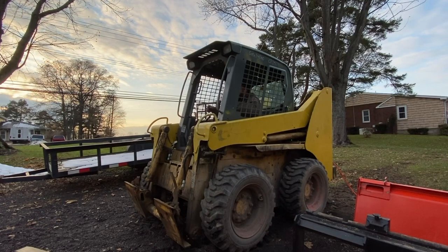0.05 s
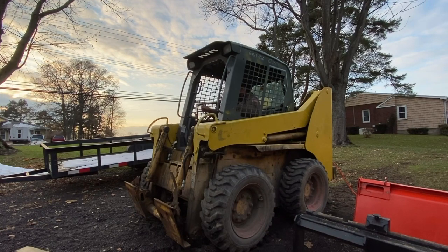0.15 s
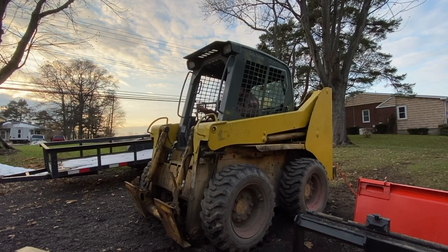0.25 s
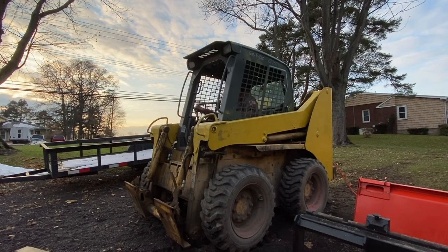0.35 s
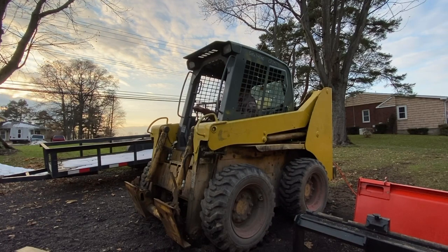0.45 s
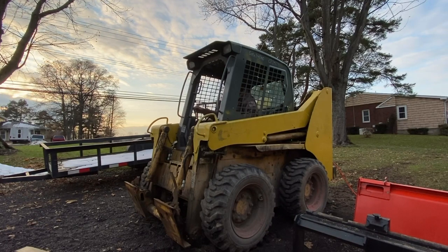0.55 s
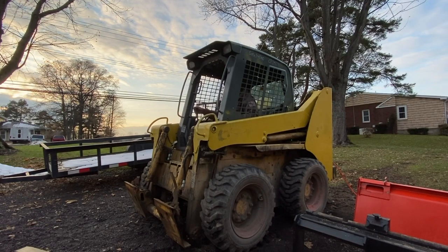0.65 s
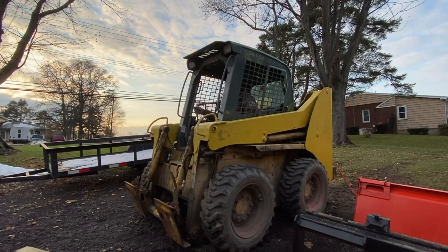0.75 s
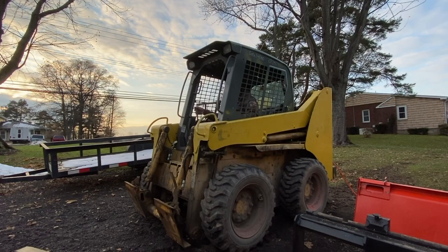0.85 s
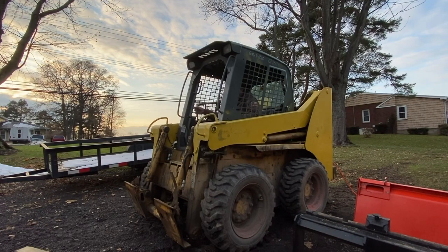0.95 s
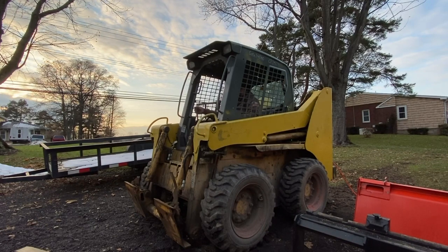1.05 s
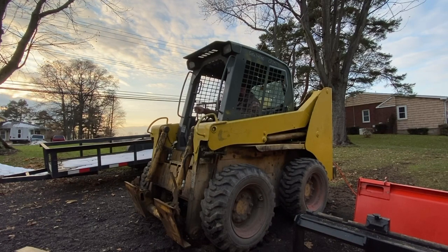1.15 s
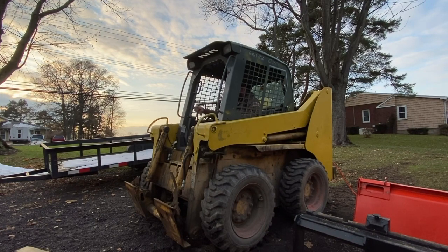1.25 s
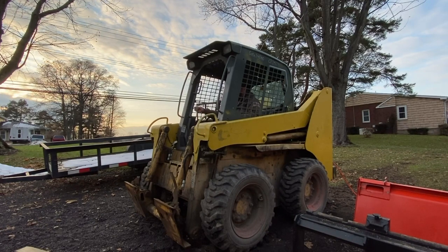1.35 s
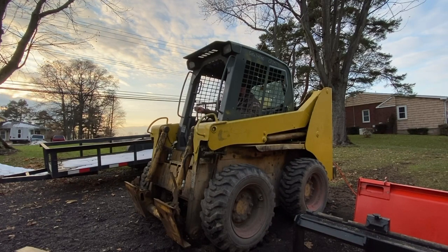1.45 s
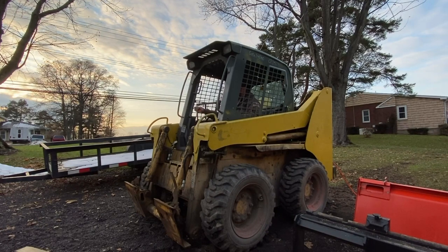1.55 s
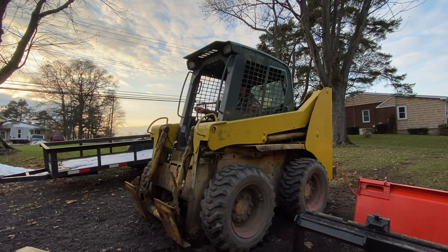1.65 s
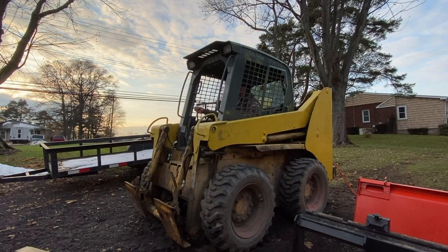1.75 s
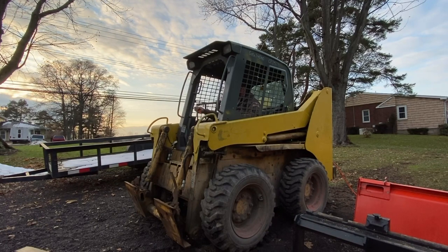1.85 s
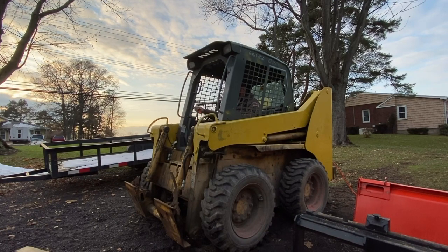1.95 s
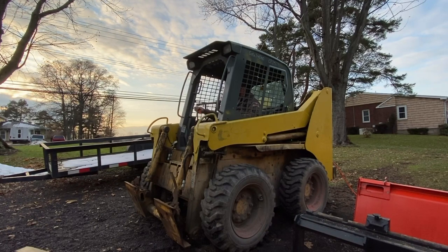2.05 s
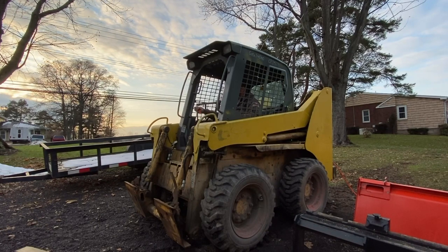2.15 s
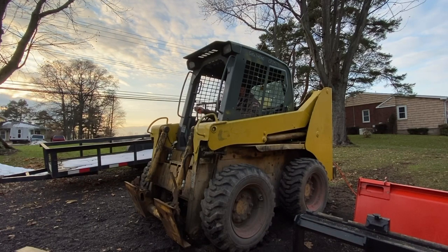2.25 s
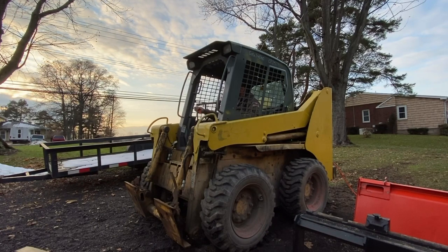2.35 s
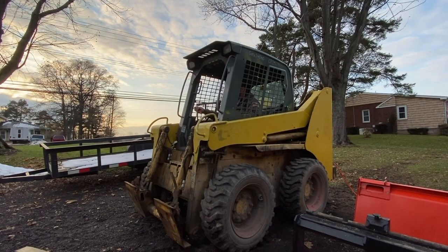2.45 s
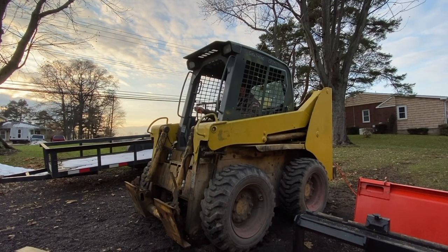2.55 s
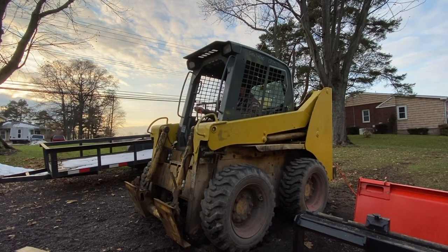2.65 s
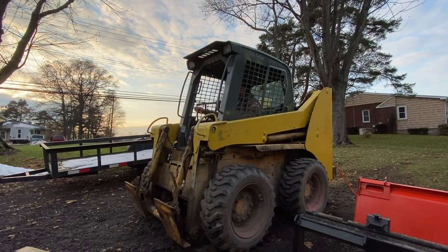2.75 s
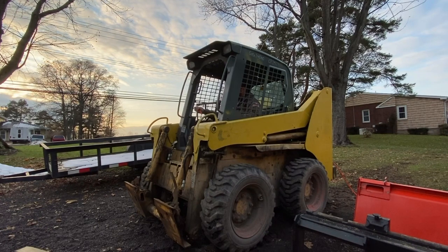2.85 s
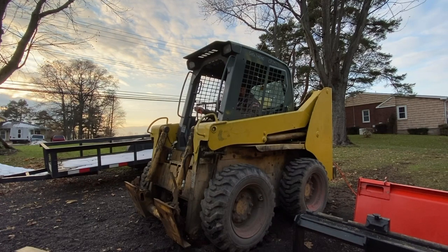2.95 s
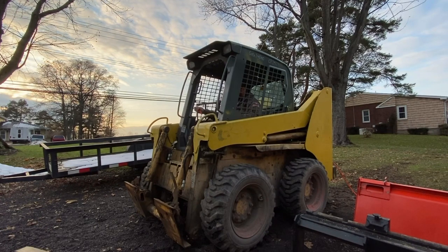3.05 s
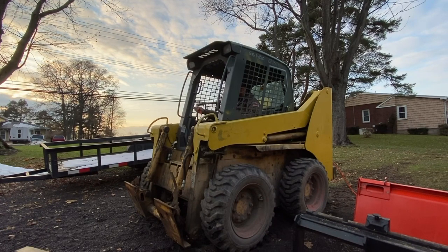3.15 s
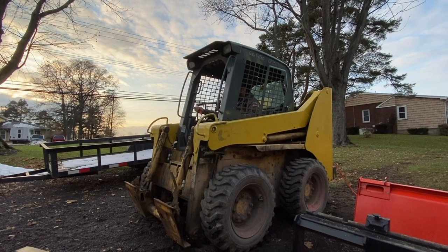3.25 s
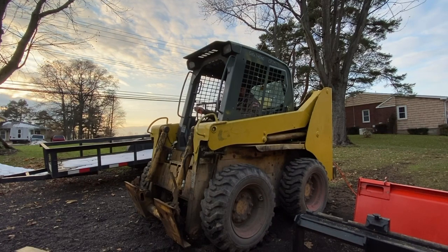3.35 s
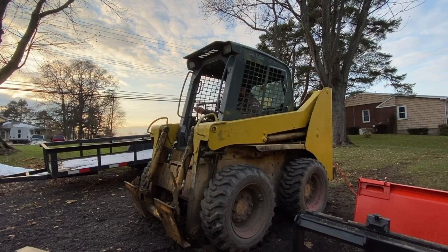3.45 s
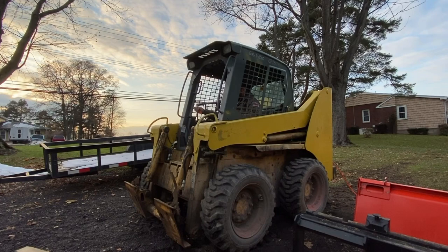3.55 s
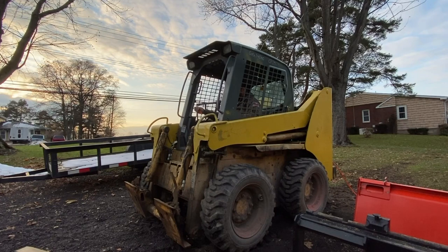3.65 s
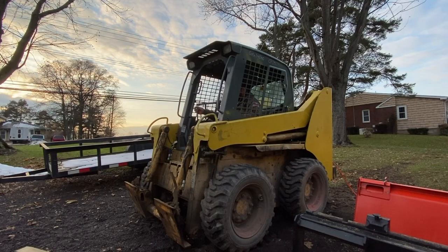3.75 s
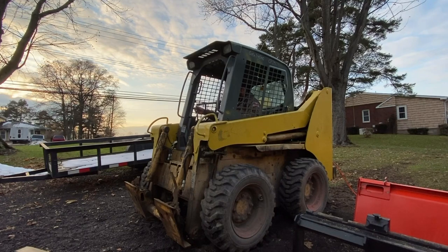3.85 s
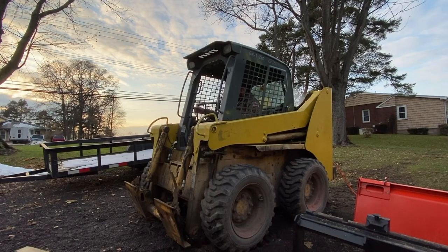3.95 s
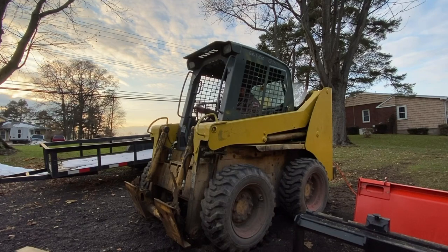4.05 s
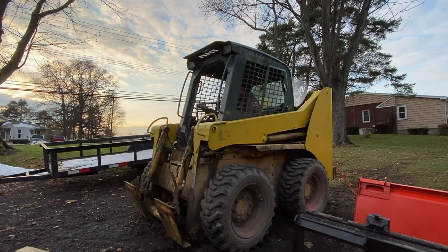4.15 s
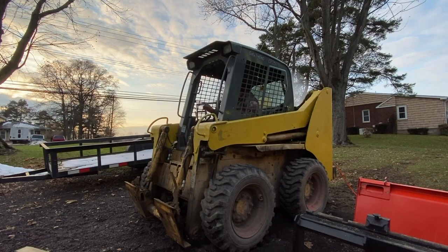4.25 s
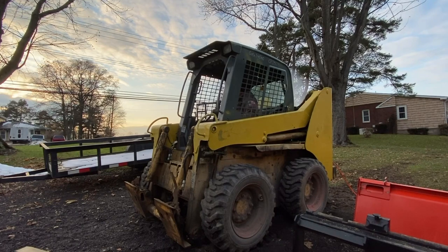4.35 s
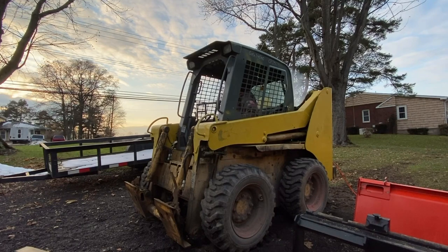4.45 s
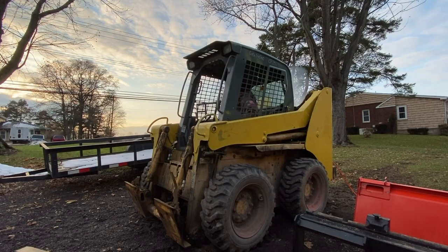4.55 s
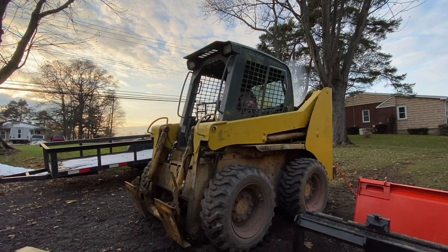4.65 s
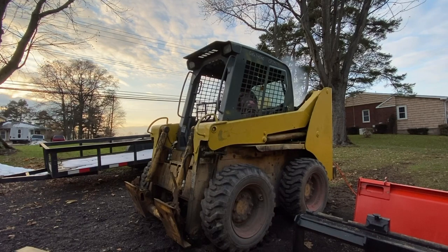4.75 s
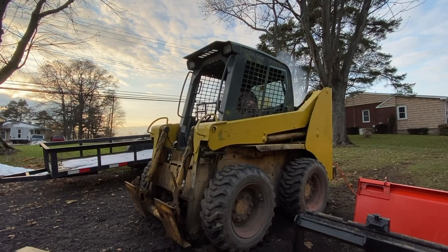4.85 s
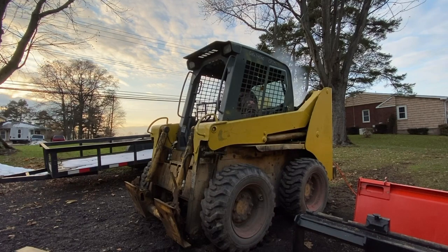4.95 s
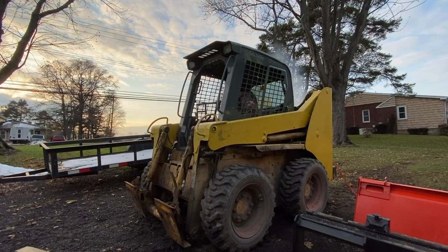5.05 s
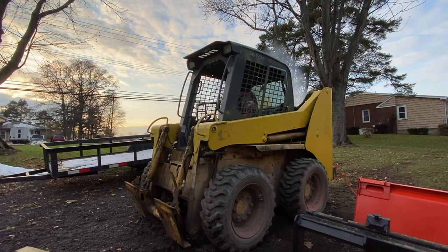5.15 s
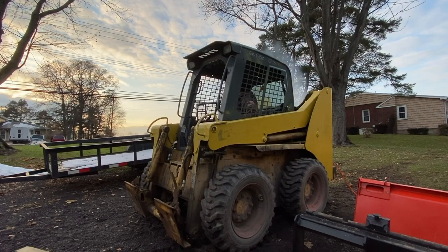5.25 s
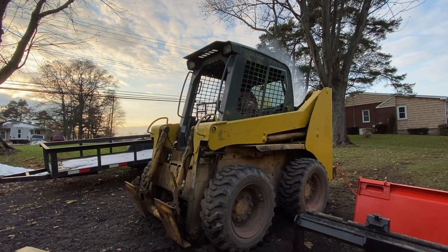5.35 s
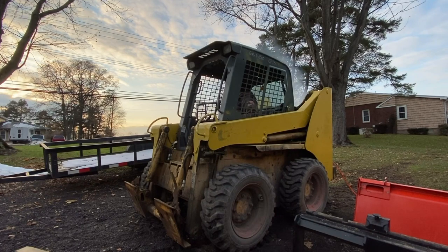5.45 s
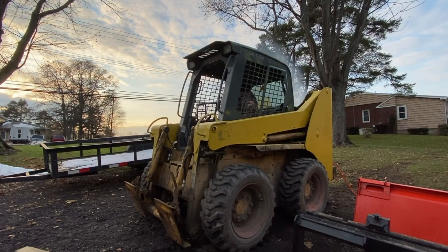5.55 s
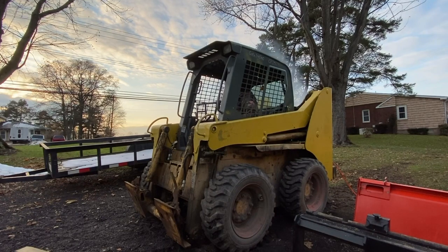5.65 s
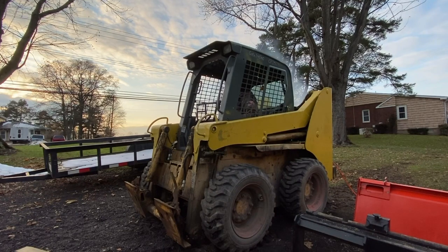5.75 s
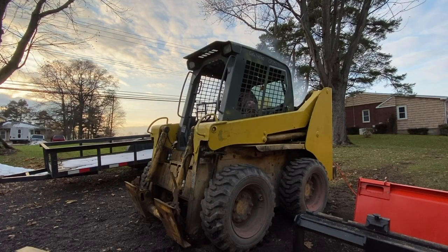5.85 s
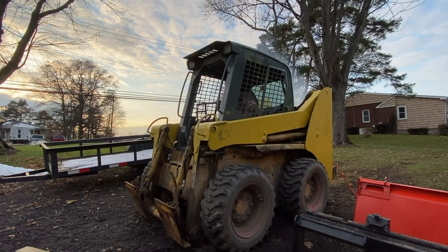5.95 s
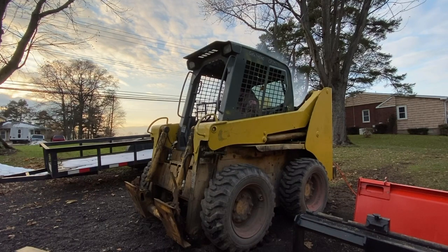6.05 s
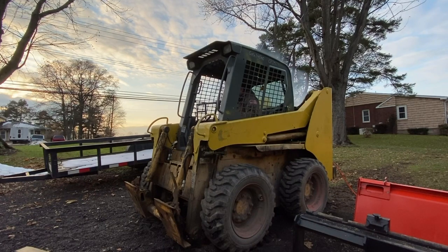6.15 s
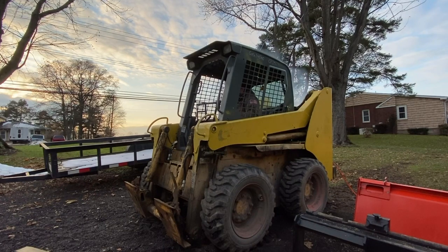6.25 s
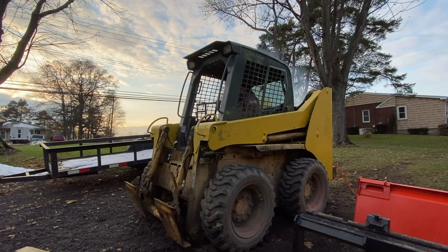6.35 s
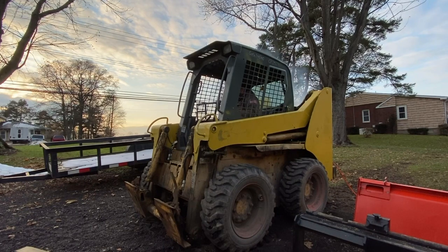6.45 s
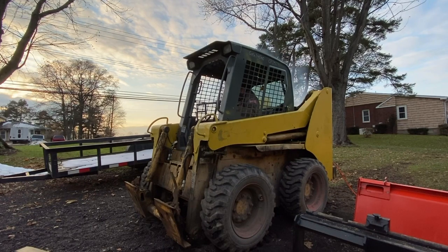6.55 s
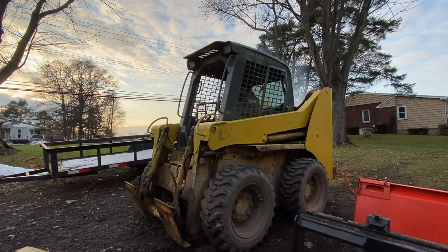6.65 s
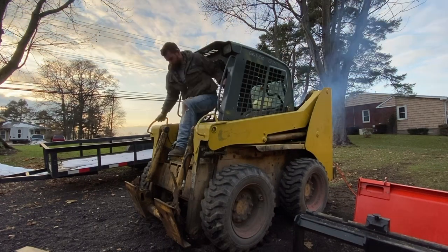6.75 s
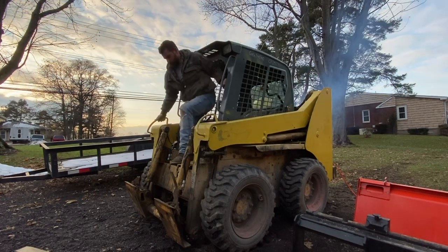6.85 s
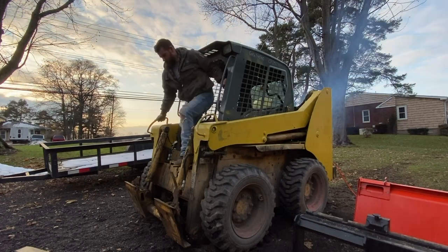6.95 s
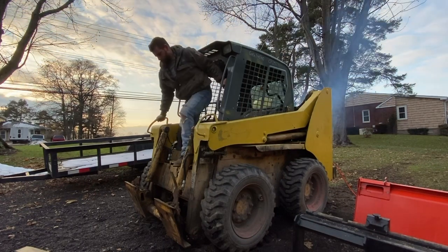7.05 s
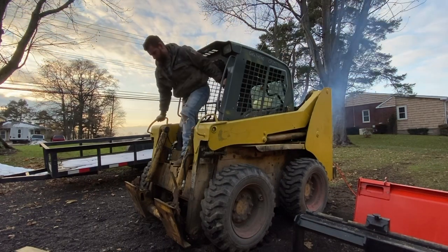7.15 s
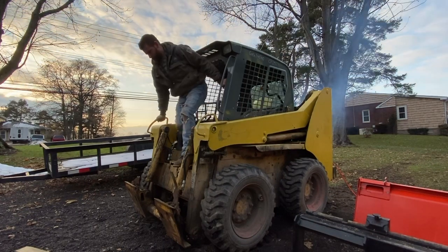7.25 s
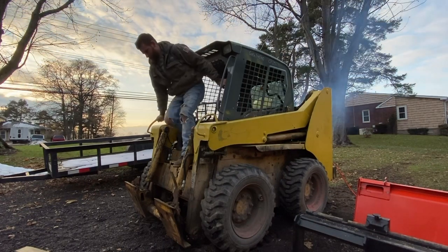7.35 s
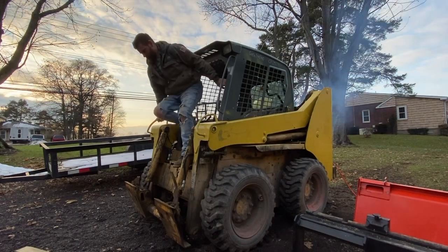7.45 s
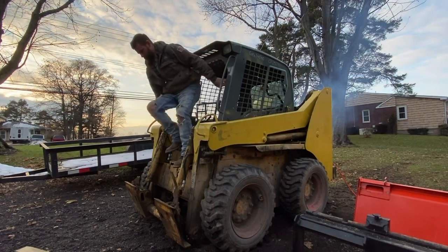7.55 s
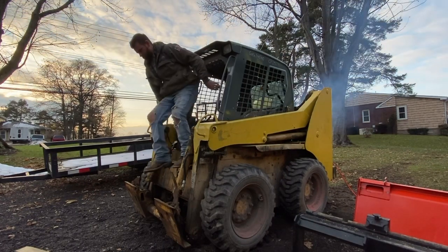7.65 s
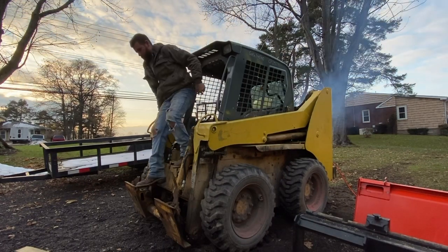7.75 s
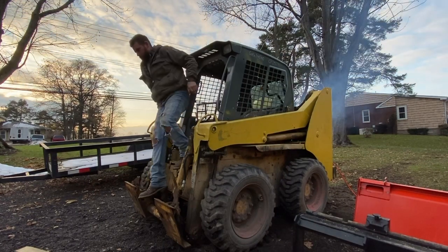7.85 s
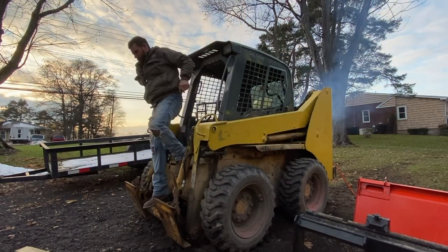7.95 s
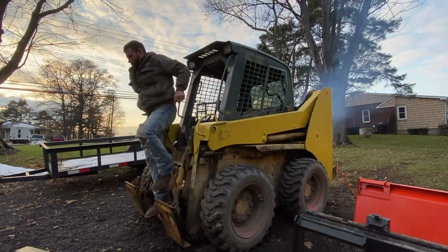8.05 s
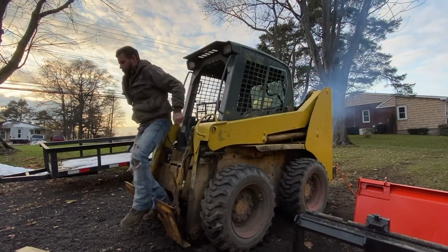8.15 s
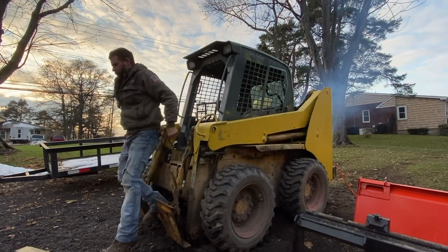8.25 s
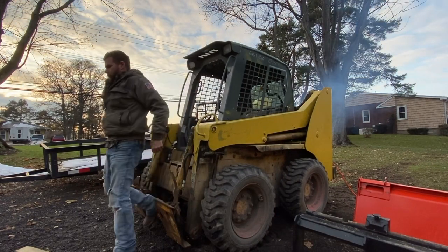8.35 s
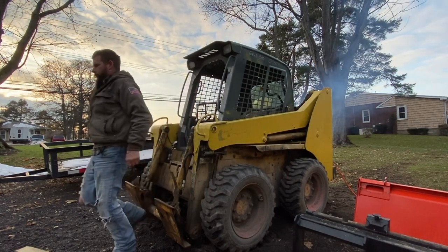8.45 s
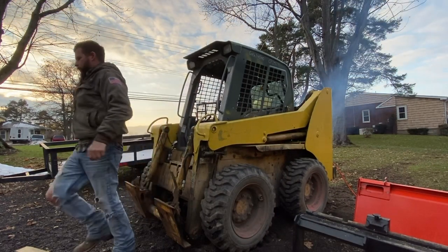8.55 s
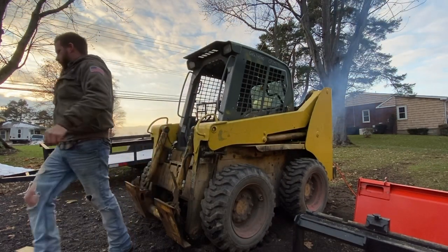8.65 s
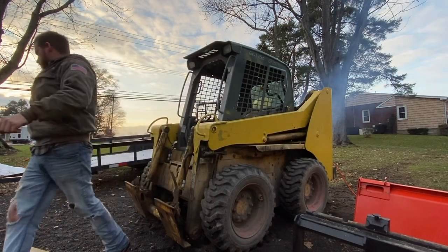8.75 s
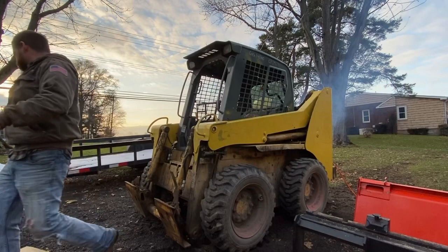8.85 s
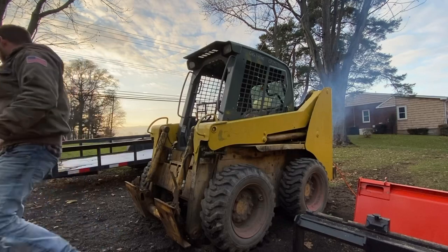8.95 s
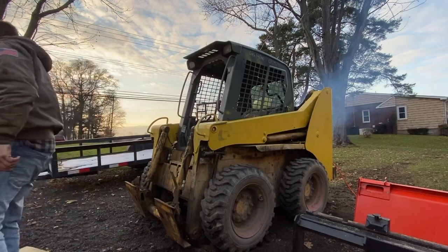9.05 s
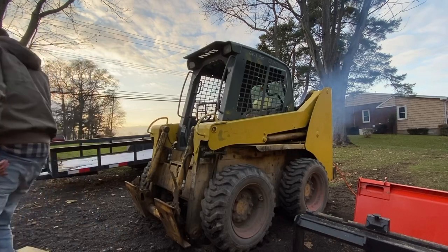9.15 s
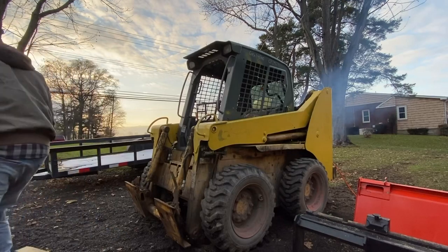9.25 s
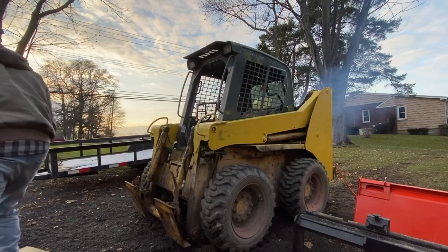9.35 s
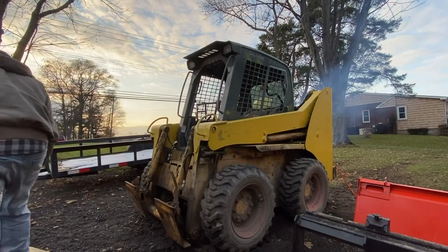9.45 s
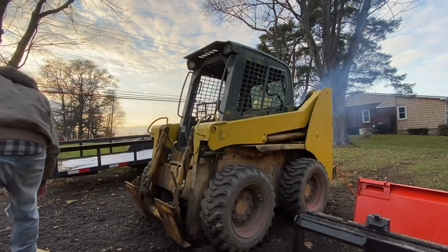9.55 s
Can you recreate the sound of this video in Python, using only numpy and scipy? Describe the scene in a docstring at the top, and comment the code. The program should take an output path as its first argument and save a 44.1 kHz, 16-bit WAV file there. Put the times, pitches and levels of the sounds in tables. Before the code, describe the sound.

Cab rustles and clicks, then a starter groans through compressions until a cold diesel knocks, catches roughly and jumps to a faster steady idle.

```python
"""Cold start of a compact loader's diesel

A four-cylinder engine in an open yard: cloth scuffs and clicks in the cab, then the starter bangs in and
groans through each compression as noise and gear tones in housing resonances. Single ignitions knock, the
engine catches, misfires and clears; from 6.6 s it is heard at a faster idle. Its layers are blows timed by
the crank. Two late clacks are boots on steel and gravel."""
import sys
import numpy as np
from scipy import signal
from scipy.fft import rfft, irfft, next_fast_len
from scipy.io import wavfile
from scipy.ndimage import uniform_filter1d, minimum_filter1d

SR = 44100
rng = np.random.default_rng(int(sys.argv[2]) if len(sys.argv) > 2 else 0)


def wrap_up_sound(samples):
    """Save the sound to the file named by the first command line argument, as 16-bit audio."""
    columns = np.atleast_2d(samples).T
    # keep every value between -1 and 1, then stretch to whole-number steps
    tamed = np.clip(columns, -1, 1)
    steps = np.round(tamed * 32767).astype(np.int16)
    wavfile.write(sys.argv[1], SR, steps)


N = 422478
T = np.arange(N) / SR
HZ = np.fft.rfftfreq(N, 1 / SR)

# engine speed: time_s, firings_per_s
SPEED_CURVE = [(3.37, 28.2), (3.62, 29.03), (3.9, 32.93), (4.12, 34.09), (4.38, 28.38), (4.87, 32.7),
               (5.17, 30.14), (5.68, 32.59), (5.92, 30.09), (6.15, 31.71), (6.6, 31.39), (6.68, 37.01),
               (7.15, 35.66), (7.55, 36.56), (8.3, 36.3), (9.58, 36.68)]
# cylinders in firing order, relative levels: exhaust_db, block_db, valve_tick_db, cold_rap_db
CYLINDER_LEVELS = [(1.5, -3, 20, 7), (8, -3.5, 22, 11.5), (5, -1, 24.5, 4), (4.5, -4.5, 20, 9.5)]
# starter strokes: start_s, level_db, gear_pitch_hz as it lets go, time to be dragged to a crawl_s
STROKES = [(1.309, -29.5, 216.2, 0.044), (1.509, -33, 316, .16), (1.724, -31.5, 338, 0.13),
           (1.904, -32.5, 373.3, 0.15), (2.098, -29, 385.4, 0.11), (2.297, -28.5, 387, 0.097),
           (2.456, -29, 380.3, 0.1), (2.612, -31, 385.8, 0.13), (2.806, -29, 388.8, .122),
           (3.005, -29, 450, .07), (3.216, -27, 539, 0.081), (3.325, -28.5, 440, 0.069)]
# single ignitions before the engine catches: start_s, knock_db, boom_db
SINGLE_IGNITIONS = [(2.308, -29, -25), (3.006, -16.5, -14), (3.068, -30, -10), (3.136, -36, -17),
                    (3.216, -16.5, -28), (3.325, -25, -13)]
# spectrum of the exhaust pipe: freq_hz, level_db
PIPE_SPECTRUM = [(18, -39.5), (28, -63), (36, -10), (46, 7), (62, 2), (74, 8.5), (95, 0.5), (110, -2),
                 (135, -15), (170, -44.5), (300, -29), (700, -103)]
# spectrum of the starter gears: freq_hz, level_db
GEAR_SPECTRUM = [(90, 4), (200, 3.5), (380, -2), (470, 3), (620, 2), (850, 0), (1100, -5), (1570, -9.5),
                 (2200, -12), (2800, -20), (5500, -19), (8000, -37.5), (15000, -70)]
KNOCK_RISE_S = 0.006


def gain_of(db):
    """Decibels to gain."""
    return 10 ** (np.asarray(db) / 20)


def evened(x):
    """Scales to rms 1."""
    return x / np.sqrt(np.mean(x ** 2) + 1e-20)


def read(points, hz):
    """Reads a spectrum on a log-frequency axis."""
    f, value = np.transpose(points)
    return np.interp(np.log(hz + 1), np.log(f + 1), value)


def add(mix, s, sound):
    """Adds a sound to the mix at time s."""
    part = mix[..., max(round(s * SR), 0):][..., :sound.shape[-1]]
    part += sound[..., :part.shape[-1]]


def causal(spectrum, size=16384):
    """Minimum-phase impulse response of unit energy: the body rings only after the blow."""
    log_gain = np.log(gain_of(read(spectrum, abs(np.fft.fftfreq(size, 1 / SR)))))
    min_phase = np.exp(np.conj(signal.hilbert(log_gain)))
    ring = np.fft.ifft(min_phase).real[:size // 2]
    return ring / np.linalg.norm(ring)


def colour(x, spectrum):
    """Passes two streams through a body with this spectrum."""
    return signal.oaconvolve(x, causal(spectrum)[None], axes=1)[:, :N]


def resonate(x, hz, width_hz):
    """One-pole resonance of gain 1, made by shifting hz to zero and smoothing."""
    turn = np.exp(2j * np.pi * np.cumsum(hz * np.ones(N)) / SR)
    r = np.exp(-np.pi * width_hz / SR)
    smoothed = signal.lfilter([1 - r], [1, -r], x / turn + 1e-18)
    return 2 * (turn * smoothed).real


def hiss(size=N):
    """White noise in two independent streams."""
    return rng.standard_normal((2, size))


def burst(rise_s, t60_s, size=13000):
    """A blow scattered over many panels: noise that swells fast, dies away and is cut at size samples."""
    t = T[:size]
    return hiss(size) * (1 - np.exp(-t / rise_s)) * gain_of(-60 * t / t60_s)


def drift(per_s):
    """Smooth chance of rms 1, with per_s new values a second."""
    return evened(np.interp(T * per_s, np.arange(4000), rng.standard_normal(4000)))


def scatter(x, t60_s):
    """Many panels throw a sound into both streams, smearing its pitch."""
    paths = burst(0.011, t60_s)
    return signal.oaconvolve(x[None], paths / np.linalg.norm(paths[0]), axes=1)[:, :N]


def below(x, hz, order):
    """The part of a sound below hz, by a zero-phase roll-off."""
    size = next_fast_len(N + SR)
    f = np.fft.rfftfreq(size, 1 / SR)
    return irfft(rfft(x, size) / (1 + (f / hz) ** order), size)[:, :N]


def limit(x, ceiling, size):
    """Look-ahead limiter: gain eases down around each peak above the ceiling."""
    gain = np.minimum(1, ceiling / (abs(x).max(0) + 1e-9))
    return x * uniform_filter1d(minimum_filter1d(gain, size), size)


def spread(x):
    """Stream 0 feeds both microphones alike, stream 1 in opposite sign; their share and tilt vary with pitch."""
    # left-right likeness: freq_hz, correlation
    likeness = [(60, 0.7), (100, 1), (160, 0.45), (270, 0.64), (450, 0.88), (740, 0.093), (2000, 0.39),
                (3300, 0.17), (15000, 0.037)]
    # left minus right: freq_hz, tilt_db
    tilt = [(100, -0.5), (250, -0.5), (600, -0.5), (1300, -1.4), (2600, .5), (5000, 4), (9000, -0.5)]
    common, opposed = rfft(x)
    same = np.clip(read(likeness, HZ), 0, 1)
    half_tilt_db = read(tilt, HZ) / 2
    side = opposed * np.sqrt((1 - same) / (1 + same))
    left = (common + side) * gain_of(half_tilt_db)
    right = (common - side) * gain_of(-half_tilt_db)
    return irfft(np.array([left, right]), N)


def faster_idle():
    """0 at the slow idle, 1 at the faster one."""
    return np.interp(T, [6.6, 6.72], [0, 1])


def crank():
    """Crank position in firings: the integral of the firing rate, offset by -0.4."""
    s, rate = np.transpose(SPEED_CURVE)
    return np.cumsum(np.interp(T, s, rate) * (T > s[0])) / SR - .4


def firings(lag, advance=0):
    """Event times and cylinders, lag firings after the exhaust peak, advance firings earlier at fast idle."""
    turns = crank() + advance * faster_idle()
    k = np.arange(int(turns[-1]) + 1)
    turning = T > SPEED_CURVE[0][0]
    return np.interp(k + lag, turns[turning], T[turning]), k % len(CYLINDER_LEVELS)


def running(x, axis):
    """Evens an engine layer while it runs, then gives it its column of the running levels."""
    # running levels, before each layer's trim: time_s, exhaust_db, block_db, valve_gear_db
    levels = [(3.3, -21, -37, -48), (3.6, -15, -28.5, -39), (4.4, -9, -27, -42), (5.8, -9.5, -28.5, -41.5),
              (6.6, -7.5, -28.5, -42), (6.73, -16, -29, -40), (9.58, -16, -28.5, -39)]
    rows = np.array(levels)
    rms = np.sqrt(np.mean(x[..., T > rows[0, 0]] ** 2))
    return x / rms * gain_of(np.interp(T, rows[:, 0], rows[:, axis]))


def yard():
    """Distant traffic rumble in the open air: steady coloured noise."""
    # rumble spectrum: freq_hz, level_db
    spectrum = [(15, -35), (25, -22), (66, 0.5), (90, 0), (103, 0), (125, 1.5), (142, -6.5), (231, -18.5),
                (373, -19), (462, -25), (833, -26), (2800, -45), (15000, -63)]
    return gain_of(-47.5) * colour(hiss(), spectrum)


def rustles(grain_db=4):
    """Clothes scuff on the seat in short swells of grainy noise."""
    # shifts in the seat: start_s, length_s, level_db
    shifts = [(0.0, 0.059, -43.5), (0.127, 0.066, -61), (0.324, 0.18, -53), (0.5, 0.13, -52)]
    # cloth spectrum: freq_hz, level_db
    spectrum = [(75, 22), (200, 17), (500, 5), (1000, -5), (2500, -9), (3200, -31), (5500, -29),
                (9000, -36), (15000, -47)]
    level = sum(gain_of(db) * np.sin(np.pi * np.clip((T - s) / length, 0, 1)) for s, length, db in shifts)
    grain = evened(gain_of(grain_db * drift(148.4)))
    return colour(hiss() * level * grain, spectrum)


def clicks(t60_s=0.12, rise_s=0.0011, tail_t60_s=0.72, clack_db=-2, ring_db=-15, tail_db=-23):
    """A noise clack and one rebound, mode clusters of small steel parts, and a faint tail from the cab."""
    # cab clicks, solenoid, boots on steel and gravel: start_s, level_db, pitch_factor, ringing_part
    hits = [(0.638, -35, 0.99, "latch"), (0.643, -48, 0.87, "latch"), (0.742, -51, 1.06, "switch"),
            (0.768, -54.5, 1.1, "switch"), (0.8, -64, 1.57, "switch"), (0.923, -46, 1.2, "switch"),
            (0.935, -36, 0.99, "switch"), (1.085, -69, 1.3, "switch"), (1.234, -43, 0.54, "latch"),
            (1.258, -43, 0.38, "latch"), (1.271, -36, 0.56, "latch"), (8.268, -38, 1.23, "latch"),
            (9.05, -37, 0.8, "latch")]
    # latch modes: freq_hz, level_db, t60_s
    latch_modes = [(546, 7.5, 0.12), (1320, -6, .08), (2030, 4, 0.1), (2250, 1, 0.068), (3020, 3, 0.12),
                   (3569, 1, 0.16), (3800, 7, 0.1), (3930, 7, 0.14), (6130, -8, 0.1)]
    # switch modes: freq_hz, level_db, t60_s
    switch_modes = [(570, 4, 0.08), (2720, 5.5, 0.082), (3450, -10, 0.1), (4064, -1, 0.12),
                    (4400, 1.5, .09), (4452, 3, 0.1), (4900, 1, 0.1), (5507, 7, 0.083), (5600, 2, 0.13),
                    (6600, -2, 0.1)]
    # clack spectrum: freq_hz, level_db
    spectrum = [(180, -8), (300, 2), (577, -3), (1150, -13), (1310, -9), (2040, -10), (2360, -11),
                (3860, -6), (11900, -18), (15000, -25)]
    t, clack, rings = T[:13000], np.zeros((2, N)), np.zeros((2, N))
    rebounds = [(s + .022, db - 9.5, size, part) for s, db, size, part in hits]
    for s, db, size, part in hits + rebounds:
        blow = burst(rise_s, t60_s) + gain_of(tail_db) * burst(0.0083, tail_t60_s)
        add(clack, s, gain_of(db + clack_db) * blow)
        ring = np.zeros((2, len(t)))
        for hz, level_db, life_s in latch_modes if part == "latch" else switch_modes:
            for _ in range(3):  # each mode is a cluster of three
                pitch_hz = (hz + rng.uniform(-45, 45)) * size
                tone = np.sin(2 * np.pi * (pitch_hz * t + rng.random((2, 1))))
                ring += gain_of(level_db - 60 * t / life_s) * tone
        add(rings, s, gain_of(db + ring_db) * ring * (1 - np.exp(-t / rise_s)))
    return colour(clack, spectrum) + rings


def gear(hz, tooth_wobble=.022):
    """Tooth count and tone of one mesh: the pitch strays by a share, each partial flutters on its own."""
    teeth = np.cumsum(hz * (1 + tooth_wobble * drift(220))) / SR
    tone = np.zeros(N)
    for n in range(1, 7):
        flutter = gain_of(2.5 * drift(90))
        tone += flutter * np.cos(2 * np.pi * n * (teeth + rng.random())) / n ** .6
    return teeth, tone


def starter(race_s=.005, drag=1.4, crawl_hz=242.3, slowest_hz=199.3, off_s=3.4, reduction_ratio=1.47,
            reduction_db=-10, coast_db=-12, swell_db=-3, whine_db=1, grind_db=-6, ring_db=-9, echo_db=-7,
            worn_db=2.5, whirr_db=-44, bang_db=-20):
    """The pinion grinds on the ring gear; after each compression it races, then the next drags it down."""
    # housing resonances: freq_hz, width_hz, level_db
    housing = [(217.7, 27, 3), (310, 40, 4.5), (384, 52, 1.5), (473, 43, 2.5), (576, 33, 6), (800, 61, 2.5),
               (986, 19, 1), (1280, 90, -3), (1520, 61, 0), (2120, 420, -8), (3370, 220, -8.5)]
    # brush and armature spectrum: freq_hz, level_db
    whirr_spectrum = [(300, 7.5), (900, 10), (2300, 5.5), (3400, 1.5), (5600, -3), (7500, -11), (10400, -9),
                      (14000, -21), (15500, -20)]
    rows = np.array(STROKES)
    start, db, top_hz, crawl_s = rows[np.maximum(np.searchsorted(rows[:, 0], T) - 1, 0)].T
    since_s = np.maximum(T - start, 0)
    part = since_s / crawl_s
    on = (T > rows[0, 0]) & (T < off_s)
    stroke = gain_of(db + np.interp(part, [0, .5, .85, 1.2], [swell_db, 0, -4, coast_db]))
    load = uniform_filter1d(on * stroke, size=200)
    hz = np.maximum(top_hz - abs(top_hz - crawl_hz) * part ** drag, slowest_hz)
    hz = hz - (hz - crawl_hz) * np.exp(-since_s / race_s)
    teeth, mesh = gear(hz)
    # the reduction gear sings above the pinion
    mesh = mesh + gain_of(reduction_db) * gear(reduction_ratio * hz)[1]
    # worn teeth bite unevenly
    bite = 0.54 + np.exp(-(teeth % 1) / 0.35)
    scrape = evened(hiss() * bite * gain_of(worn_db * drift(160)))
    # tooth harmonics slide through the housing resonances, summed in alternating sign
    ring, whine = 0, 0
    for k, (f, width_hz, level_db) in enumerate(housing):
        gain = (-1) ** k * gain_of(level_db)
        ring = ring + gain * resonate(scrape, f, width_hz)
        whine = whine + gain * resonate(mesh, f, width_hz)
    tone = gain_of(whine_db) * load * whine / np.std(whine[on])
    out = load * (gain_of(grind_db) * colour(scrape, GEAR_SPECTRUM) + gain_of(ring_db) * evened(ring))
    out += gain_of(echo_db) * scatter(tone, .08)
    out += tone * np.array([[.8], [0]])  # direct whine, common to both microphones
    # brushes and armature whirr on evenly
    out += gain_of(whirr_db) * uniform_filter1d(on * 1., size=900) * colour(hiss(), whirr_spectrum)
    bang = np.zeros((2, N))
    rough = gain_of(worn_db * drift(151)[:13000])
    add(bang, 1.258, gain_of(bang_db - 12.0) * burst(0.016, 1.0) * rough)
    add(bang, 1.298, gain_of(bang_db) * burst(0.0032, 0.11))
    return out + colour(bang, GEAR_SPECTRUM)


def pinion(rise_s=.004, t60_s=0.41, grit_db=4):
    """Tooth ends scrape brightly as the pinion slides into the ring gear: one gritty noise burst."""
    # pinion engagement: start_s, level_db
    meshing = (1.27, -51.5)
    # scrape spectrum: freq_hz, level_db
    spectrum = [(2000, -12), (6000, -8), (9500, 4), (14000, -2), (15500, -8)]
    s, db = meshing
    out = np.zeros((2, N))
    add(out, s, gain_of(db) * burst(rise_s, t60_s))
    return colour(out * evened(gain_of(grit_db * drift(220))), spectrum)


def shake(level_db=-39):
    """Frame shudder: pipe-coloured noise that grows as the starter turns, then stays."""
    growth = np.interp(T, [1.28, 1.32, 3.3, 3.5], [0.012, 0.73, 1.5, 3.6])
    return gain_of(level_db) * colour(hiss(), PIPE_SPECTRUM) * growth


def thumps(rise_s=0.011, puff_lead_s=.0627, puff_db=-25.5, puff_hz=60.4, boom_delay_s=.0093, boom_hz=66.4):
    """Engagement jolt, air puffs of cranking and first ignitions each ring low for a few cycles."""
    # frame jolt as the pinion engages: start_s, level_db, nominal pitch_hz
    jolt = (1.307, -19, 99)
    puffs = [(s - puff_lead_s, puff_db, puff_hz) for s, *_ in STROKES[2:-1]]
    booms = [(s + boom_delay_s, db, boom_hz) for s, _, db in SINGLE_IGNITIONS]
    t, out = T[:8000], np.zeros(N)
    swell = t / rise_s * np.exp(1 - t / rise_s)
    for s, db, nominal_hz in [jolt] + puffs + booms:
        pitch_hz = nominal_hz * rng.uniform(0.89, 1.17)
        add(out, s, gain_of(db) * swell * np.sin(2 * np.pi * pitch_hz * t))
    return out


def backlash(rise_s=0.0086, t60_s=0.1, level_db=-28):
    """As each compression lets go, the ring gear overtakes the pinion and the teeth slap."""
    out = np.zeros((2, N))
    for s, *_ in STROKES[2:-1]:
        add(out, s, burst(rise_s, t60_s))
    return gain_of(level_db) * colour(out, GEAR_SPECTRUM)


def knock(own, spectrum, t60_s, loose):
    """One blow of set energy: the frame answers much the same each time, loose parts differently."""
    raw = own + loose * burst(KNOCK_RISE_S, t60_s)
    ring = colour(raw, spectrum)
    return ring * np.linalg.norm(own) / np.linalg.norm(ring)


def knocks(thud_t60_s=.13, crack_t60_s=.11, loose=0.58):
    """Late, violent ignitions hammer the frame: single thuds, then pairs of dull thud and bright crack."""
    # double knocks: start_s, thud_db, gap_s until the crack, crack_db
    pairs = [(3.142, -39, 0.0018, -30), (3.327, -19, .002, -27), (3.424, -23, .002, -32),
             (3.482, -10, 0.0043, -28), (3.528, -9, .006, -31), (3.657, -9.5, 0.036, -27),
             (3.692, -11.5, 0.067, -28), (3.728, -23, 0.0023, -39), (3.8, -8.5, 0.0029, -22),
             (3.838, -11.5, 0.0022, -34), (3.882, -18, .002, -36), (3.93, -9.5, .028, -20),
             (4.006, -16.5, 0.002, -36), (4.046, -16, 0.022, -23), (4.161, -17.5, 0.03, -28),
             (4.245, -27, .002, -41), (4.292, -20.5, 0.029, -31), (4.43, -12, 0.027, -22),
             (4.462, -17.5, 0.0024, -33), (4.568, -10.5, 0.026, -28), (4.608, -14, .002, -34),
             (4.698, -12.5, 0.028, -29), (4.734, -21.5, 0.0022, -37), (4.822, -13.5, 0.027, -22),
             (4.854, -23, .002, -35), (4.948, -12.5, 0.029, -23), (5.071, -16, 0.035, -25),
             (5.204, -14, 0.032, -21.5), (5.334, -14, 0.026, -20), (5.368, -15.5, .002, -34),
             (5.462, -14.5, 0.033, -20), (5.587, -17.5, 0.026, -21), (5.71, -22.5, 0.03, -23),
             (5.968, -34, 0.021, -25), (6.482, -30, 0.0032, -31)]
    # thud spectrum: freq_hz, level_db
    thud_spectrum = [(100, 5.5), (250, -6), (300, -4), (345, 5.5), (385, 0.5), (431, 15), (480, 1),
                     (545, -11.5), (600, 0), (670, -6.5), (755, 1), (830, -11), (910, -4.5), (1150, -13),
                     (1550, -12.5), (1800, -16), (2400, -20), (2900, -27.5), (6000, -36), (15000, -46)]
    # crack spectrum: freq_hz, level_db
    crack_spectrum = [(200, 5), (450, -9), (800, 3), (1100, -10), (1400, 10), (1600, -1), (1780, -15),
                      (2050, 2.5), (2550, -18), (2900, -18), (7000, -20), (15000, -53)]
    out = np.zeros((2, N))
    thud, crack = burst(KNOCK_RISE_S, thud_t60_s), burst(KNOCK_RISE_S, crack_t60_s)
    for s, db, *_ in SINGLE_IGNITIONS + pairs:
        add(out, s, gain_of(db) * knock(thud, thud_spectrum, thud_t60_s, loose))
    for s, _, gap, db in pairs:
        add(out, s + gap, gain_of(db) * knock(crack, crack_spectrum, crack_t60_s, loose))
    return out


def exhaust(lag=-0.52, uneven_db=2.0, level_db=2.0, cold_loss_db=-21, warm_s=4.62):
    """One pulse a firing booms in the muffler; cylinder 0 burns weakly until warm, misfires leave holes."""
    # misfires: time_s, level_change_db
    misfires = [(5.06, -18), (5.575, -23), (5.825, -17), (5.855, -18.5), (6.625, -11.5), (6.815, -10),
                (9.13, -18)]
    times, cylinder = firings(lag)
    peaks = firings(0)[0]
    db = np.array(CYLINDER_LEVELS)[cylinder, 0] + uneven_db * rng.standard_normal(len(times))
    db += cold_loss_db * (cylinder == 0) * (peaks < warm_s)
    for s, loss_db in misfires:
        db[np.argmin(abs(peaks - s))] += loss_db
    pulses = np.zeros(N)
    pulses[np.minimum((times * SR).astype(int), N - 1)] = gain_of(db)
    boom = signal.oaconvolve(pulses, causal(PIPE_SPECTRUM))[:N]
    return gain_of(level_db) * running(boom, axis=1)


def block(lag=.15, t60_s=0.23, loose=0.35, uneven_db=1.0, level_db=-1.0, fast_db=-2):
    """Each cylinder strikes the block in its own repeating way; loose parts rattle differently each time."""
    # block spectrum at slow idle: freq_hz, level_db
    slow_spectrum = [(90, -22), (150, -4), (185, -8), (280, -8), (440, -8), (530, -12), (680, -20),
                     (760, -15.5), (950, -18), (1080, -26), (1400, -16), (1750, -49), (2100, -33),
                     (2800, -34), (6000, -37), (15000, -55)]
    # block spectrum at fast idle: freq_hz, level_db
    fast_spectrum = [(90, -37), (150, -21.5), (185, -11.5), (280, -10.5), (450, -9.5), (530, -12),
                     (700, -20), (800, -12.5), (980, -17.5), (1070, -28), (1350, -13.5), (1800, -28.5),
                     (2250, -20.5), (2800, -34), (6000, -38.5), (15000, -53)]
    own, out = [burst(0.0024, t60_s) for _ in CYLINDER_LEVELS], np.zeros((2, N))
    for s, k in zip(*firings(lag)):
        blow = own[k] + loose * burst(0.00085, t60_s)
        add(out, s, blow * gain_of(CYLINDER_LEVELS[k][1] + uneven_db * rng.standard_normal()))
    slow = colour(out * (1 - faster_idle()), slow_spectrum)
    fast = gain_of(fast_db) * colour(out * faster_idle(), fast_spectrum)
    return gain_of(level_db) * running(slow + fast, axis=2)


def clatter(hz, length_s, width_hz, rise_s, size=2400, t60_s=.085):
    """Sheet metal chatters around one pitch: band noise held for length_s, then decaying."""
    t, f = T[:size], np.fft.rfftfreq(size, 1 / SR)
    ring = irfft(rfft(hiss(size)) * np.exp(-((f - hz) / width_hz) ** 2), size)
    ring *= np.minimum(t / rise_s, 1) * gain_of(-60 * np.maximum(t - length_s, 0) / t60_s)
    return np.sqrt(length_s) * ring / np.linalg.norm(ring, axis=1, keepdims=True)


def cover(lag=0.022, rise_s=0.0018, width_hz=120, loose=0.38, slow_db=-13, fast_db=-9.0):
    """Each cylinder shakes a sheet-metal cover in its own repeating way, more strongly at the faster idle."""
    # clatter per cylinder in firing order: level_db, pitch_hz, length_s
    chatter = [(0, 1533, 0.021), (4.5, 1478, 0.016), (0, 1500, 0.012), (0.5, 1480, 0.0047)]
    own = [clatter(hz, length, width_hz, rise_s) for _, hz, length in chatter]
    out = np.zeros((2, N))
    for s, k in zip(*firings(lag)):
        db, hz, length = chatter[k]
        add(out, s, gain_of(db) * (own[k] + loose * clatter(hz, length, width_hz, rise_s)))
    return running(out, axis=2) * gain_of(slow_db + (fast_db - slow_db) * faster_idle())


def valves(lag=-0.21, advance=0.14, t60_s=0.077, rise_s=0.0098, grit_db=3, uneven_db=2.3, tick_db=-11):
    """Injectors and tappets spit a gritty tick each firing over the pulsing wash of gears and fan."""
    # tick spectrum: freq_hz, level_db
    tick_spectrum = [(2000, -10), (5000, 0), (7700, -9.5), (10200, 0.5), (11500, 0), (13000, 2),
                     (15500, -10)]
    # wash spectrum: freq_hz, level_db
    wash_spectrum = [(1000, 15), (2500, 7.5), (3500, 8), (4500, 0.5), (5000, 3), (5500, 9), (6000, 4.5),
                     (6700, 2.5), (7700, -5), (10000, 0), (15000, -22)]
    own, out = [burst(rise_s, t60_s) for _ in CYLINDER_LEVELS], np.zeros((2, N))
    for s, k in zip(*firings(lag, advance)):
        add(out, s, own[k] * gain_of(CYLINDER_LEVELS[k][2] + uneven_db * rng.standard_normal()))
    grit = gain_of(grit_db * evened(uniform_filter1d(rng.standard_normal(N), 40)))
    turns = crank()
    pulse = 1 + 0.45 * np.cos(2 * np.pi * (turns - .2 + advance * faster_idle()))
    wash = hiss() * np.clip(turns + 0.3, 0, 1) * pulse * np.sqrt(grit)
    ticks = gain_of(tick_db) * running(colour(out * grit, tick_spectrum), axis=3)
    return ticks + running(colour(wash, wash_spectrum), axis=3)


def rap(lag=.32, t60_s=0.22, uneven_db=1.4, level_db=-9.0):
    """At the slow idle each cold cylinder ignites with a short, bright rap."""
    # rap spectrum: freq_hz, level_db
    spectrum = [(300, -14), (800, -11), (1100, -6.5), (1400, 2), (1580, -9), (1750, -2.5), (2100, -2),
                (2550, -3), (2900, -15.5), (7000, -26.5), (15000, -69)]
    out = np.zeros((2, N))
    for s, k in zip(*firings(lag)):
        db = CYLINDER_LEVELS[k][3] + uneven_db * rng.standard_normal()
        add(out, s, burst(0.00053, t60_s) * gain_of(db))
    return gain_of(level_db) * running(colour(out, spectrum), axis=2) * (1 - faster_idle())


def tappets(lag=-0.069, advance=.16, scatter_s=0.0036, level_db=-12, count=7):
    """Needle-sharp ticks reach both microphones directly; each one's delay between them sets its direction."""
    # tick spectrum: freq_hz, level_db
    spectrum = [(2000, -25), (5500, -8), (7700, -13), (10200, -4), (11500, -5), (14000, -1), (15500, 6)]
    out = np.zeros((2, N))
    for s, k in zip(*firings(lag, advance)):
        for _ in range(count):
            tick = np.zeros((2, 8))
            # left lands 1 sample before to 3 after right
            tick[0, rng.integers(2, 7)] = tick[1, 3] = rng.choice([-1, 1])
            db = CYLINDER_LEVELS[k][2] + rng.uniform(-8.4, 8.1)
            add(out, s + scatter_s * rng.standard_normal(), tick * gain_of(db))
    return gain_of(level_db) * running(colour(out, spectrum), axis=3)


def hum(waver_db=2.5, waver_turns=.067):
    """At the faster idle panels pick single orders out of the engine's shaking, wavering in level and phase."""
    # panel lines: multiple_of_firing_rate, rms_level_db
    orders = [(3.75, -40), (5, -38), (5.25, -41), (6.25, -39), (7, -41.5), (8, -54), (9.25, -44.5),
              (9.5, -46), (10, -50.5), (10.5, -46), (11, -49.5), (12, -46), (12.25, -43.5), (12.5, -50),
              (13, -51.5), (13.5, -56)]
    turns, lines = crank(), np.zeros(N)
    for order, db in orders:
        level = gain_of(db + waver_db * drift(12))
        phase = order * turns + waver_turns * drift(8) + rng.random()
        lines += level * np.cos(2 * np.pi * phase)
    return np.sqrt(2) * faster_idle() * lines


def scene():
    """Machine and yard spread in stereo, bass sources in the middle; a left delay sets it a little right."""
    engine = block() + cover() + valves() + rap() + knocks()
    cranking = starter() + pinion() + backlash() + shake()
    wide = spread(engine + cranking + clicks() + rustles() + yard())
    left, right = wide + exhaust() + hum() + thumps()
    return np.array([np.pad(left, (2, 0))[:N], right]) + tappets()


def record(dry, low_cut_hz=33, edge_hz=15750):
    """Limits the bass, dips the level briefly at 6.65 s, adds microphone colour and band limits."""
    # microphone's top-octave dip and peak: freq_hz, level_db
    mic = [(11200, 0), (11800, -11), (12200, -14), (12700, 3), (13300, 3), (14600, 6), (15400, -1)]
    bass = below(dry, 150, order=8)
    held = dry - bass + limit(bass, ceiling=.44, size=400)
    held = held - below(held, low_cut_hz, order=10)
    dip = 1 - .85 * np.exp(-((T - 6.649) / .004) ** 2)
    hz = np.linspace(0, SR / 2, 513)
    response = gain_of(read(mic, hz)) * (hz < edge_hz)
    band = signal.firwin2(401, hz, response, window=("kaiser", 9), fs=SR)
    return signal.oaconvolve(held * dip, band[None], "same", axes=1)


dry = scene()
out = record(dry)
wrap_up_sound(out)
```